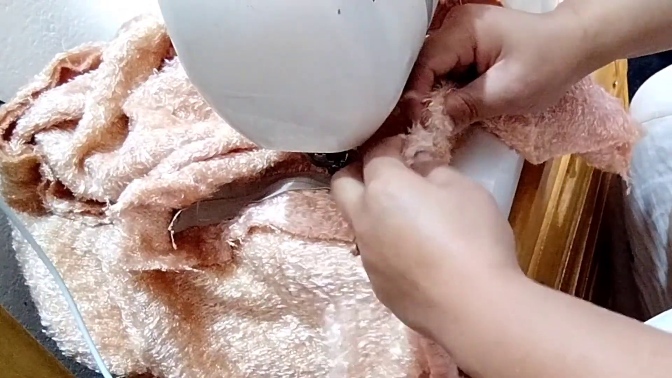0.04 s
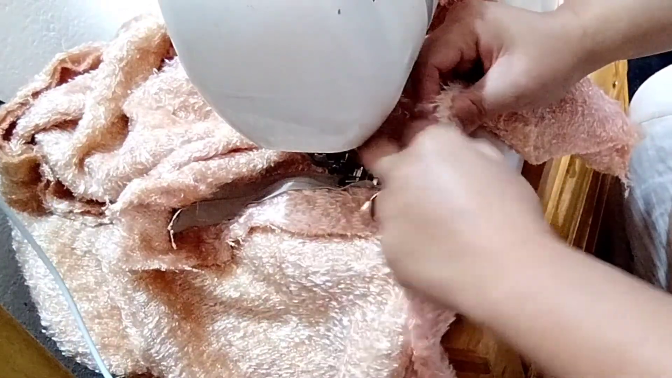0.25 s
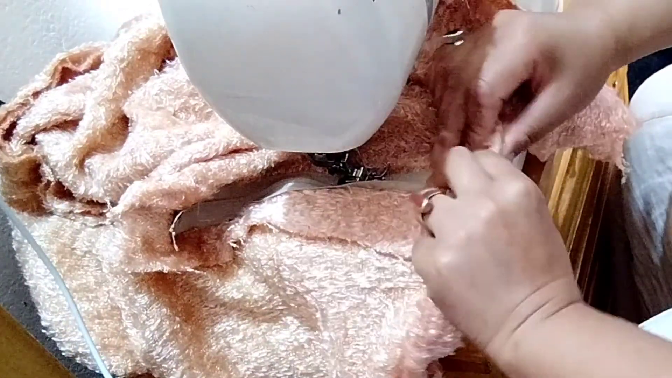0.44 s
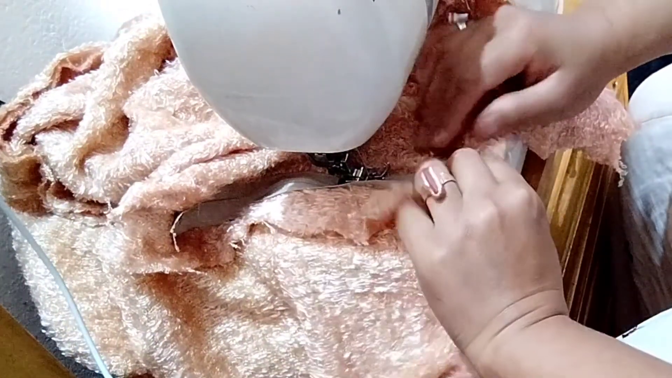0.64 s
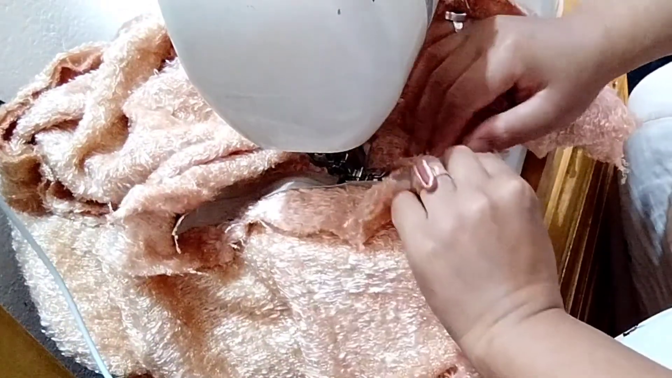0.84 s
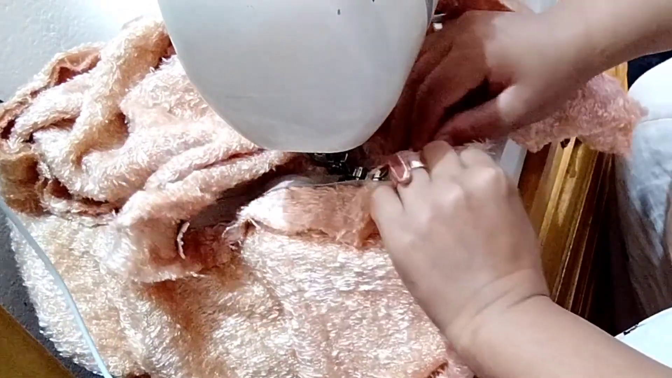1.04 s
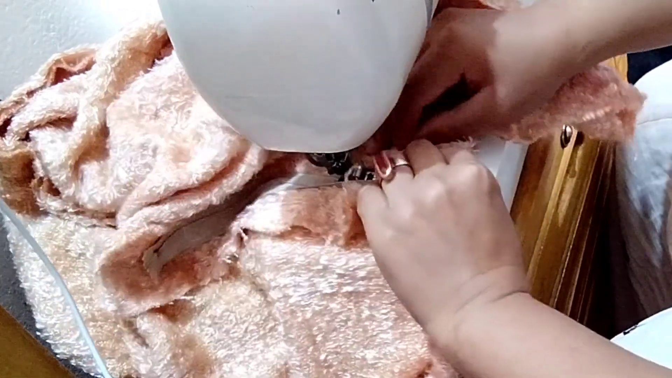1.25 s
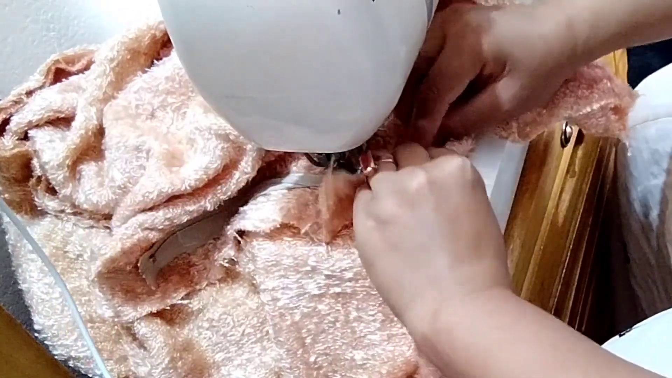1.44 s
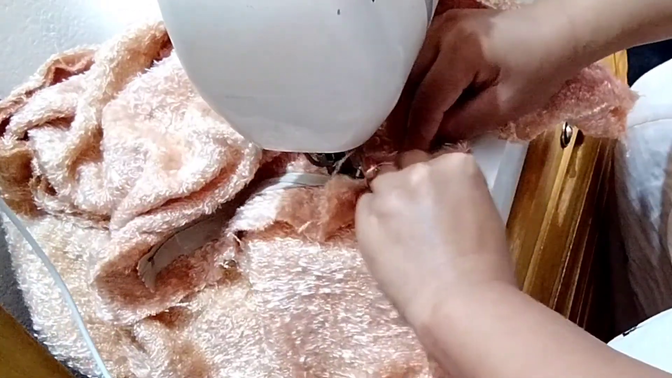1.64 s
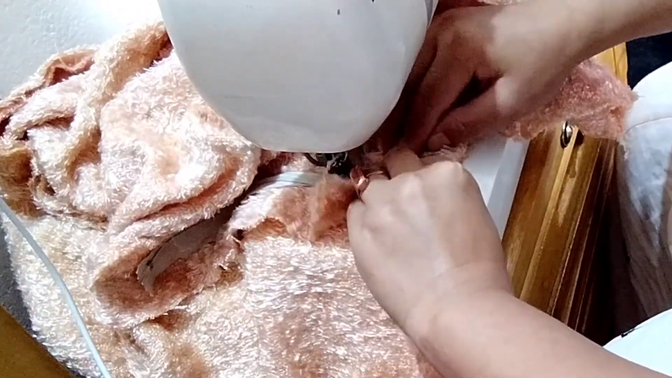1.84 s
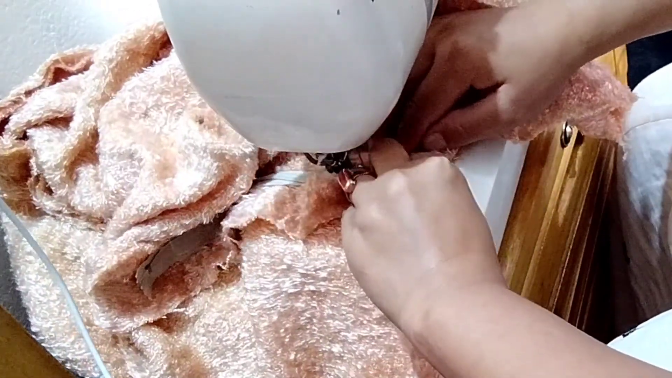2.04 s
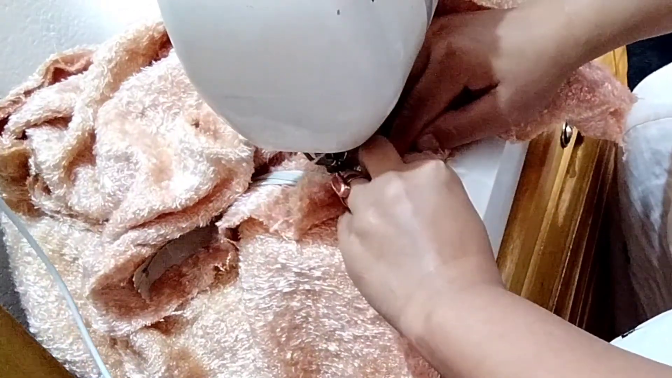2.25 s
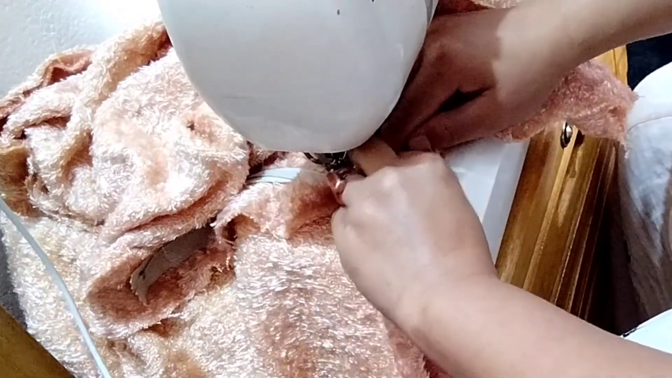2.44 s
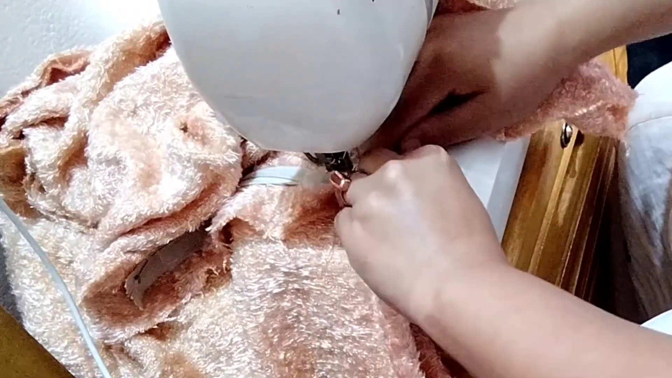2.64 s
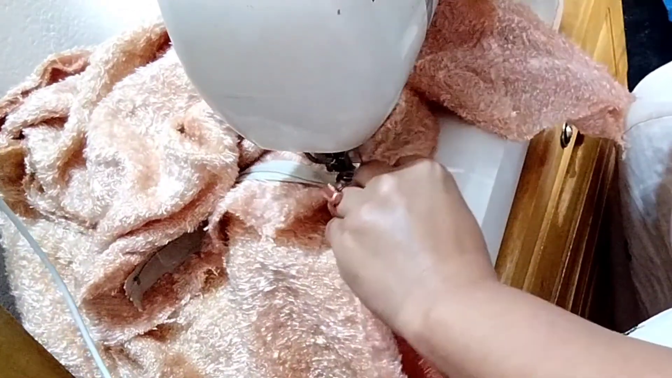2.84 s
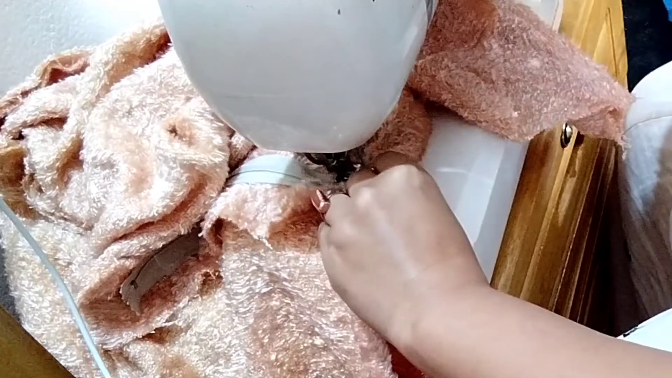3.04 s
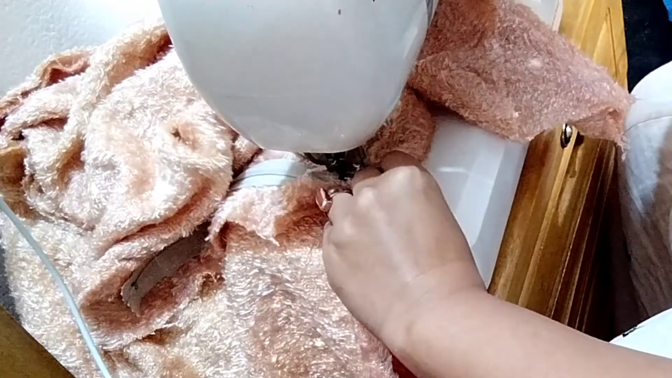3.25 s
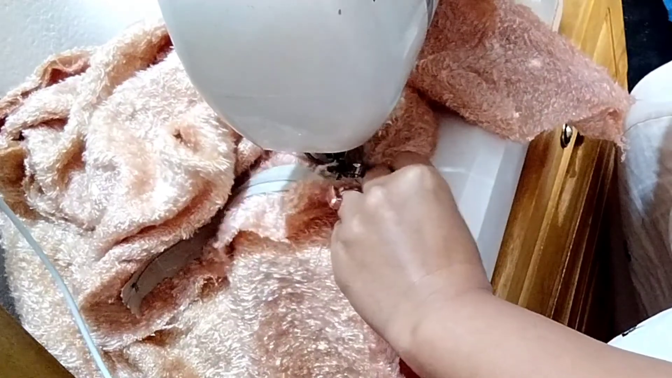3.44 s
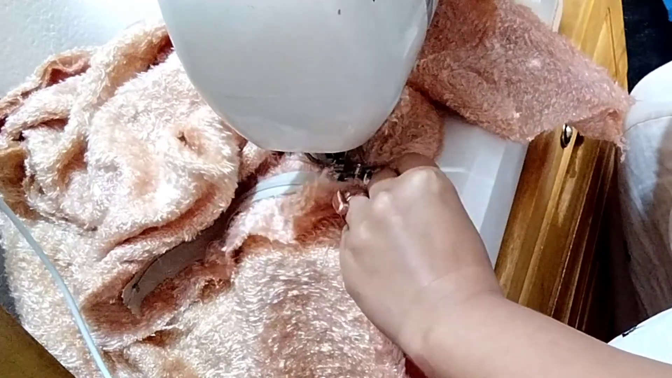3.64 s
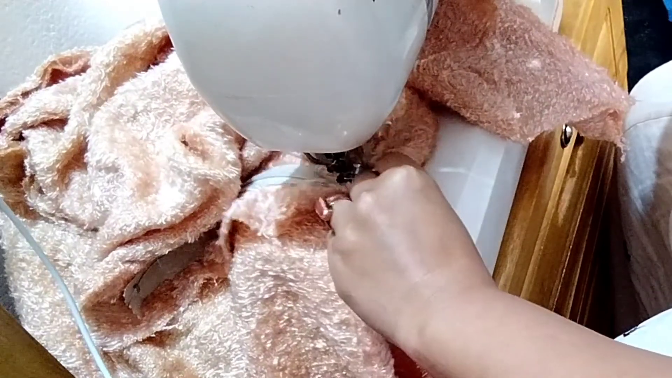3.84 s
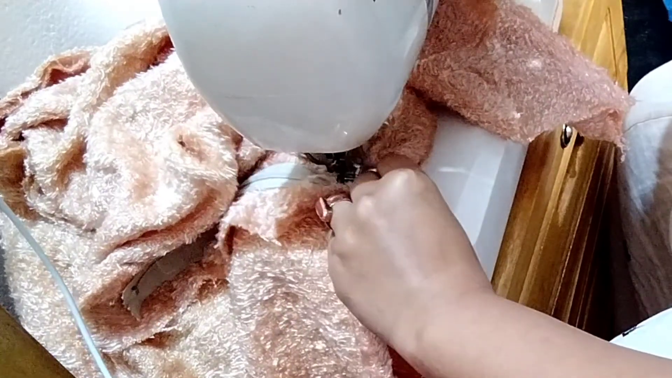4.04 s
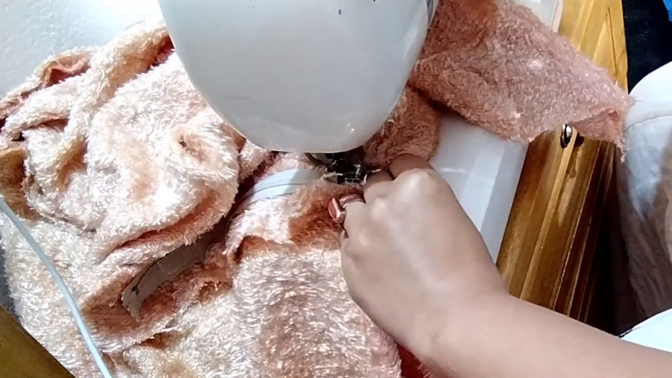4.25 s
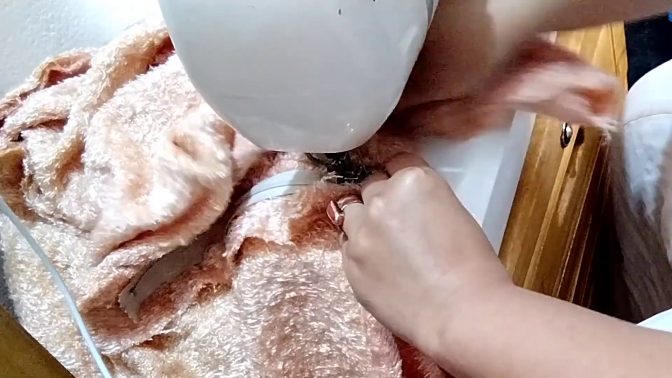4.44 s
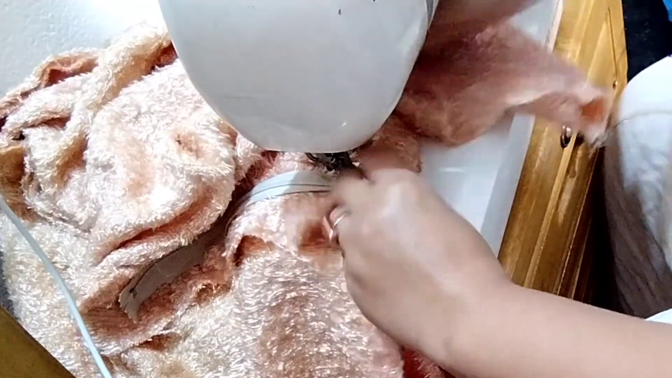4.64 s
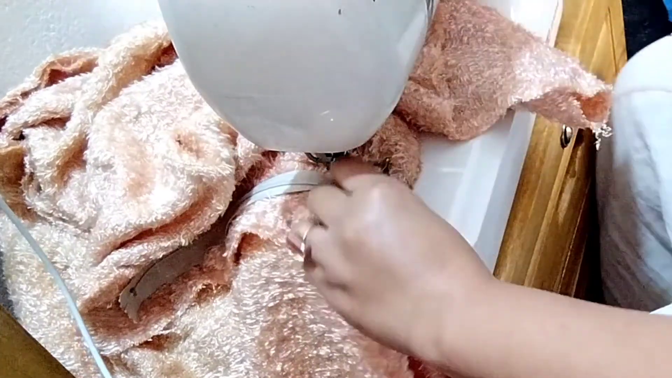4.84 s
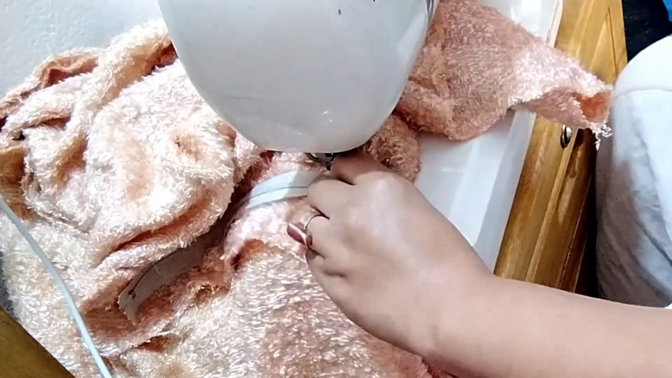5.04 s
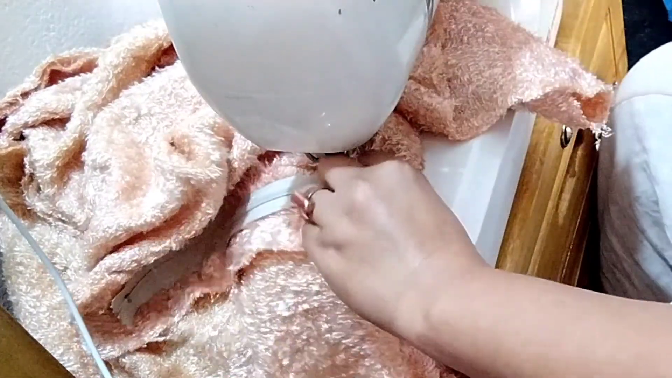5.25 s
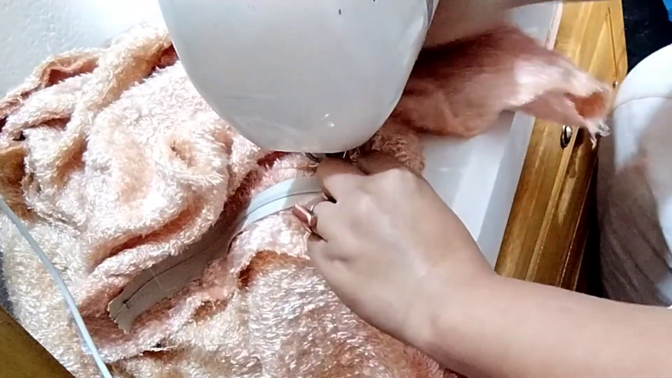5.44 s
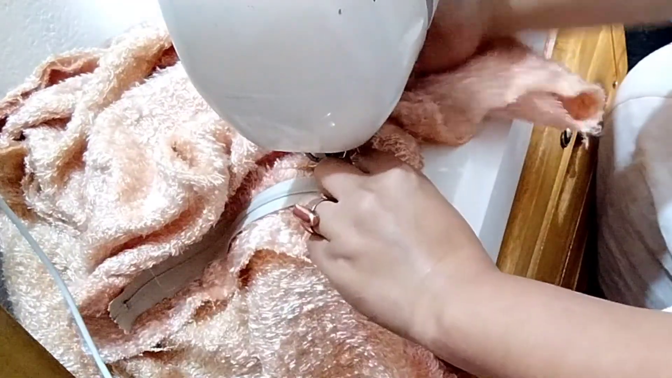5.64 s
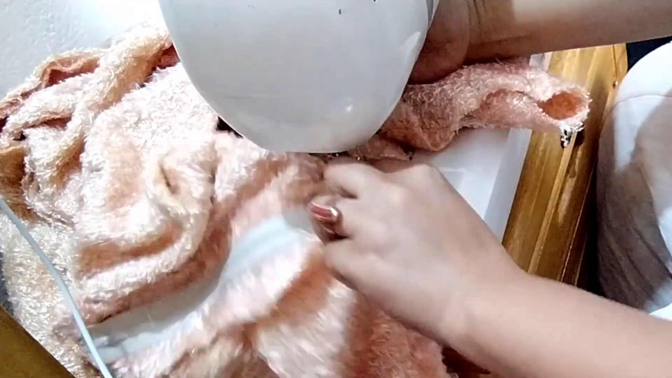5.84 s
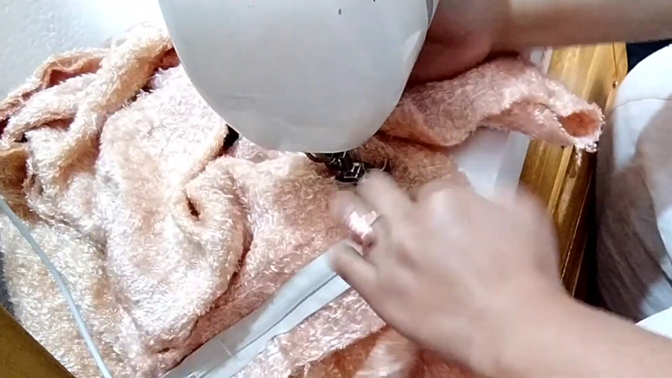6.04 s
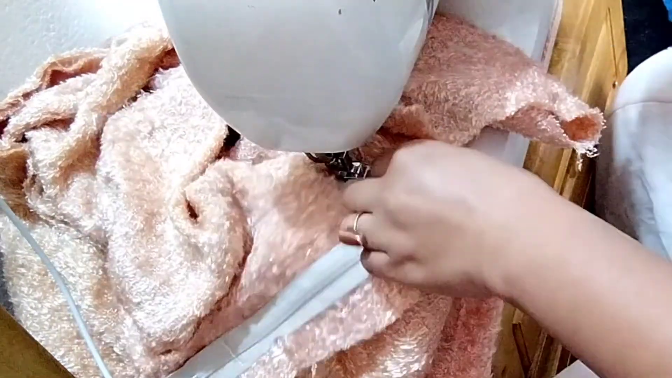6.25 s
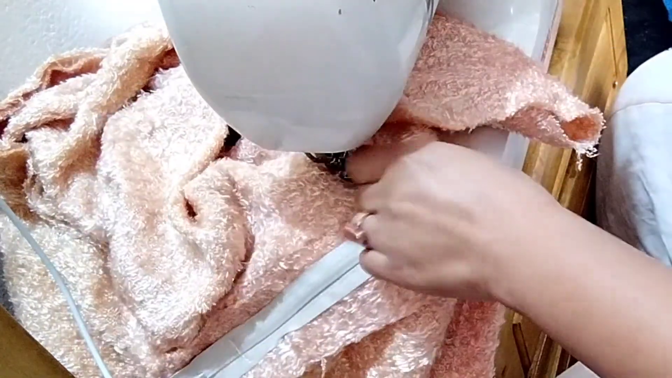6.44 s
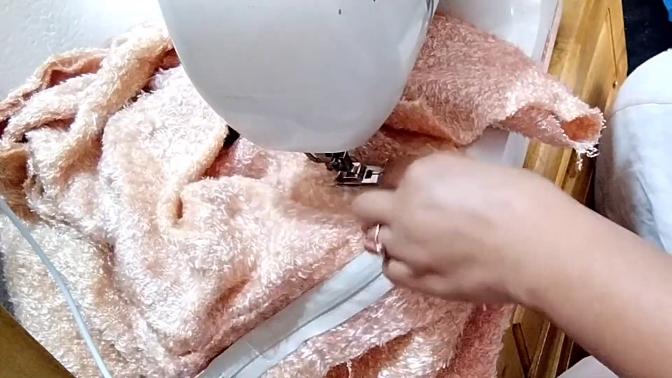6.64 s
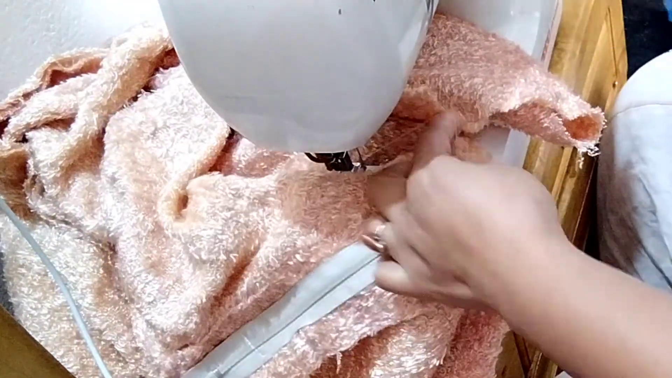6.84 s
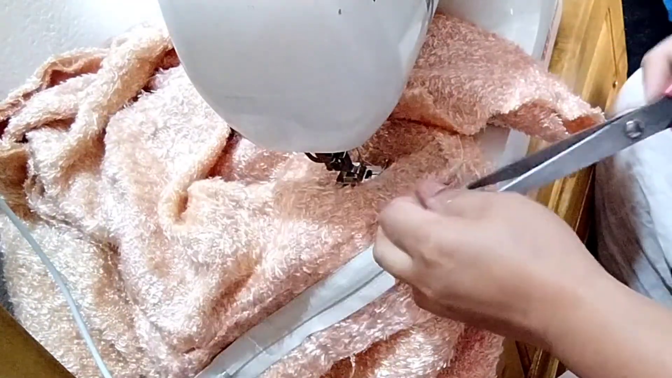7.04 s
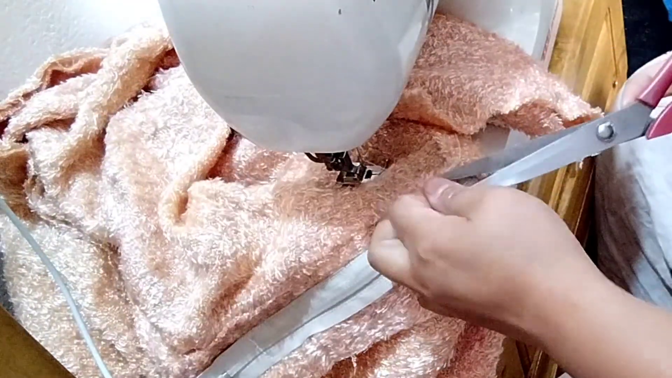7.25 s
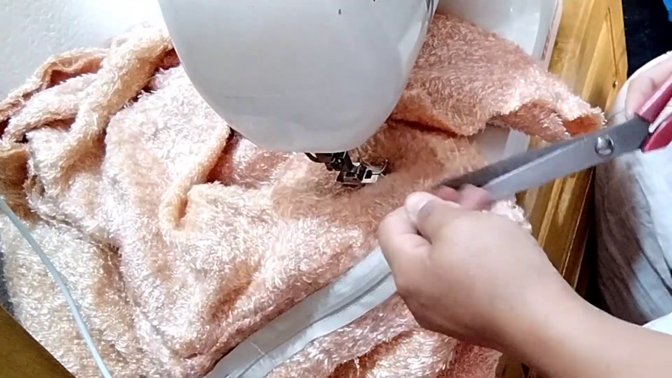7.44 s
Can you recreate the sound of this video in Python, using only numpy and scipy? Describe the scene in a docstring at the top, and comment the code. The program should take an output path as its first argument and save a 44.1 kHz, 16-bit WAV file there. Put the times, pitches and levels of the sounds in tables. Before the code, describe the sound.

In a small, quiet room, an electric sewing machine starts stitching thick towelling close to the microphone. The needle ticks and knocks rapidly over a rattling, low drone that shakes the wooden table, the speed wavering with one brief slowdown. After about three and a half seconds it stops. Hands shift the cloth with soft rustles, levers click and knock, and scissors clink and clatter briefly as they are picked up.

```python
"""Sewing machine on a wooden table

An electric machine stitches thick towelling at a wandering speed, then stops. Each needle stroke ticks,
knocks the housing and thumps the table; the linkage rattles over a low drone. Hands then shift the
cloth, work the levers and pick up scissors. Small room, faint hum."""
import sys
import numpy as np
from scipy import signal
from scipy.fft import rfft, irfft, next_fast_len
from scipy.io import wavfile
from scipy.ndimage import uniform_filter1d, map_coordinates

SR = 44100
rng = np.random.default_rng(int(sys.argv[2]) if len(sys.argv) > 2 else 0)


def wav_record(signal):
    """Record a signal, one row per channel, as 16-bit PCM in the file named by sys.argv[1]."""
    frames = np.transpose(np.atleast_2d(signal))
    bounded = np.clip(frames, -1, 1)
    # unit amplitude maps onto the largest positive 16-bit level
    quanta = np.round(bounded * 32767).astype(np.int16)
    wavfile.write(sys.argv[1], SR, quanta)


N = 330750
TIME_S = np.arange(N) / SR
FIRST_STITCH_S, BAND_LIMIT_HZ = 0.8225, 15800

# pace set by the pedal (time [s], rate [stitches/s])
STITCH_RATE = [(0.8, 12.6), (0.99, 13.8), (1.12, 21.7), (1.34, 23.0), (1.58, 6.0), (1.69, 15.8),
               (2.13, 14.4), (2.63, 15.3), (2.98, 19.6), (3.51, 21.7), (3.79, 19.8), (4.13, 21.3),
               (4.33, 9.3)]
# drive effort against the cloth (time [s], level [dB])
DRIVE_EFFORT = [(.778, -75), (.792, -52), (.88, -49.5), (.97, -42.5), (1.06, -40.5), (1.31, -37.5),
                (1.41, -41.5), (1.54, -48), (1.7, -40), (1.93, -39.5), (2.05, -47.5), (2.2, -43.5),
                (2.39, -47), (2.48, -42.5), (2.6, -44), (3.2, -38.5), (3.45, -40), (3.7, -38.5),
                (3.95, -38.5), (3.985, -41), (4.04, -39.5), (4.19, -39.5), (4.27, -45.5), (4.335, -44.5),
                (4.375, -57.5), (4.42, -66)]
# needle through thick folds (time [s], tick [dB], housing knock [dB])
FOLD_PUNCHES = [(0.8021, -48, -44.5), (0.8221, -43, -40.5), (.8995, -56.5, -43.5), (.9487, -48.5, -42),
                (0.9728, -46, -38.5), (1.0403, -45.5, -36), (1.0956, -41, -33.5), (1.1402, -39.5, -32),
                (1.189, -39, -39), (1.232, -41.5, -36), (1.278, -42, -33.5), (1.411, -46.5, -39),
                (1.4861, -46, -48), (1.589, -44.5, -43), (1.6921, -47, -37), (1.744, -44, -41.5),
                (1.8062, -45.5, -38), (1.8705, -42.5, -52), (1.948, -43.5, -46), (2.0098, -42.5, -45),
                (2.127, -53.5, -44), (2.2196, -41.5, -42.5), (2.291, -49, -41), (2.3465, -40, -37),
                (2.4174, -41, -36.5), (2.4811, -42.5, -34.5), (2.5515, -49.5, -39.5), (2.617, -47.5, -35),
                (2.6816, -44.5, -39), (2.7428, -40.5, -31.5), (2.812, -43.5, -37), (2.8563, -38, -34.5),
                (2.9091, -40, -35.5), (2.9682, -46.5, -44), (3.0869, -44.5, -37.5), (3.1134, -43.5, -34.5),
                (3.163, -39.5, -31.5), (3.2184, -42, -37), (3.3596, -49, -43), (3.4049, -42, -36),
                (3.453, -45.5, -41), (3.548, -42.5, -37.5), (3.687, -44, -34.5), (3.6984, -39, -36),
                (3.7387, -42, -36), (3.789, -43, -42), (3.8434, -38.5, -38), (3.992, -37, -41),
                (4.034, -40, -31.5), (4.0836, -44, -34.5), (4.1774, -44, -36), (4.3227, -39, -42.5)]
# table drone (time [s], base level [dB])
DRONE_LEVEL = [(.785, -56), (.88, -54), (.93, -45.5), (1.06, -45.5), (1.2, -44.5), (1.31, -40), (1.42, -42),
               (1.53, -60), (1.6, -40), (1.82, -46), (1.95, -45.5), (2.17, -44.5), (2.28, -49), (2.55, -45),
               (2.66, -45.5), (2.85, -42.5), (3.65, -47.5), (3.86, -40), (3.94, -44.5), (4.0, -50),
               (4.05, -41), (4.17, -48), (4.27, -41.5), (4.34, -54.5), (4.41, -87)]
# feed teeth snapping down (time [s], level [dB])
FEED_SNAPS = [(1.052, -46), (1.085, -55), (1.649, -54.5), (1.724, -45.5), (1.901, -57), (2.4035, -51.5),
              (2.652, -45), (2.7043, -54.5), (2.771, -45.5), (2.885, -47), (2.939, -45.5), (3.061, -50),
              (3.141, -46), (3.748, -47), (4.189, -42), (4.2414, -52), (4.2985, -65), (4.313, -46.5)]
# bobbin hook contacts (time [s], level [dB])
HOOK_TINKS = [(1.7664, -47), (1.8182, -44), (1.919, -46), (2.923, -46), (2.9806, -44), (3.032, -54.5),
              (3.1847, -42), (3.236, -43.5), (3.2807, -46), (3.333, -45.5), (3.381, -43.5), (3.4184, -45),
              (3.523, -50), (3.664, -51), (3.7574, -44.5), (3.808, -45), (3.8574, -43), (3.965, -50.5),
              (4.1997, -48)]
# lever, presser foot, drive and scissor contacts
# (time [s], clack [dB], thud re clack [dB], edge re clack [dB], table top [dB], t60 [s])
HANDLING_KNOCKS = [(.698, -67, -8, -22, -85, .07), (0.748, -72, -2, -22, -69, 0.036),
                   (.783, -68, 4, -25, -49, .06), (1.2795, -34.5, 0.5, -14, -38, 0.043),
                   (4.3236, -50, -3, 2, -44.5, 0.063), (4.518, -78, 11, -22, -61.5, .07),
                   (4.5708, -60.5, 10, -0.5, -70, 0.047), (4.576, -51.5, 3.5, -21, -56, .068),
                   (4.7028, -62.5, 8.5, -3, -64, 0.052), (4.762, -70, -7, -23, -66, 0.055),
                   (4.923, -62.5, 5.5, -19, -59, 0.099), (4.985, -52, 3, -15.5, -58, 0.078),
                   (5.0605, -56.5, 5, -13, -58, 0.059), (5.737, -65.5, 7, -15, -70, 0.069),
                   (5.7484, -61.5, -5, -9, -71, .04), (5.8185, -69, 12, -1, -70, .06),
                   (5.864, -72, 10, 7, -72, 0.04), (5.9658, -41.5, 1, -7.5, -47, 0.057),
                   (6.07, -61.5, -18, -4, -87, .009), (6.412, -42, 2.5, -15, -70, 0.062),
                   (6.4394, -53, 8, -5, -66, 0.097), (6.4502, -40.5, 1, -22, -45, 0.054),
                   (6.463, -44.5, -2, -13.5, -45, 0.043), (6.503, -47.5, -2, -28, -48, .063),
                   (6.5452, -56, 9, -23, -55, .088), (6.5762, -57, 4.5, -25, -47, .064),
                   (6.609, -50.5, 7.5, -14, -53, 0.09), (6.646, -57, 8, -20, -50, .077),
                   (6.675, -49.5, 16.5, -23, -65, 0.022), (6.6792, -41.5, 4, -23, -42, 0.017),
                   (6.6911, -49, 9.5, -21, -48, .1), (7.02, -82, 11, 6, -85, .03),
                   (7.254, -82, 2, 11, -78, .028)]
# heavy pushes on the table (time [s], level [dB])
TABLE_JOLTS = [(0.389, -63), (1.042, -35), (1.142, -38), (1.279, -29), (1.69, -50), (2.34, -37.5),
               (2.621, -36), (3.164, -42.5), (3.834, -36.5), (4.039, -42), (4.575, -55), (4.708, -50.5),
               (5.058, -49), (5.185, -57), (5.961, -52), (6.615, -46.5), (6.676, -51.5)]
# scissors picked up (time [s], base level [dB])
SCISSOR_CLINKS = [(6.413, -45.5), (6.448, -53), (6.4618, -52), (6.507, -58), (6.6805, -44.5), (6.6916, -60)]
# hands on the towelling (time [s], rub [dB], fibre hiss [dB])
HAND_RUB = [(0, -85, -97), (.12, -73, -93), (.3, -81.5, -99), (.56, -79.5, -96), (.76, -76, -89.5),
            (4.4, -71, -80.5), (4.85, -73.5, -87.5), (5.12, -75, -85), (5.33, -75, -93), (5.55, -74, -91),
            (5.75, -68.5, -84.5), (5.8, -71, -84), (5.88, -70, -83), (5.93, -68.5, -82.5), (6.3, -71, -86),
            (6.7, -65.5, -82.5), (6.85, -70, -82), (7.1, -77, -93), (7.5, -69.5, -83.5)]
# cloth dragged over the bed (peak time [s], rise [s], rub [dB], fibre hiss [dB])
CLOTH_SHOVES = [(.4, 0.035, -75.5, -80.5), (.444, 0.02, -82, -72), (4.55, 0.024, -76, -95),
                (5.03, 0.04, -52.5, -72.5), (5.065, 0.012, -48, -62), (5.158, 0.0065, -58, -79),
                (5.197, 0.043, -57, -68), (5.752, .007, -65, -75), (5.828, 0.011, -60, -69),
                (5.84, .005, -59, -69), (5.851, .003, -72, -72), (6.457, 0.0086, -43.5, -78),
                (6.509, 0.022, -51, -93), (6.635, 0.012, -52, -84), (6.991, 0.015, -68, -81),
                (7.435, 0.011, -64, -84)]
# room air (time [s], level [dB])
ROOM_AIR_LEVEL = [(0, -74), (.7, -79), (4.5, -72.5), (6.2, -70), (7.1, -70), (7.5, -71.5)]

# resonances (frequency [Hz], bandwidth [Hz], gain [dB])
PLATE_MODES = [(2624, 80, 1.5), (2924, 80, 0.5), (3520, 130, -1.5), (5580, 240, -4.5), (6400, 110, -0.5),
               (7100, 300, -7), (7820, 330, -3), (9050, 140, -12), (10200, 140, -12), (13950, 130, -13),
               (15200, 220, -13.5)]  # needle plate and presser foot
TABLE_MODES = [(196, 40, -14), (223.6, 22, -13), (267, 14, -4.5), (337.3, 24, -9), (371, 17, -2),
               (425, 45, -11)]  # table under the machine
SWAY_MODE = [(128, 47, 0)]  # table's lowest mode
TABLE_TOP_MODES = [(266.4, 22.5, 4), (371, 9, -5)]  # table top, lightly knocked
CASING_MODES = [(525, 6.3, -5), (660, 3, 5), (950, 14, -21.5), (1198, 20, 9.5), (1500, 13, 2),
                (2000, 14, -19), (2215, 71, -16.5), (2680, 14, -1.5), (3115, 58, -2.5)]  # plastic casing
# scissor blades (frequency [Hz], gain [dB], t60 [s])
BLADE_MODES = [(1050, -3, .07), (1366, 5, 0.051), (1560, -6, .08), (2008, 3.5, 0.045), (2310, 6.5, 0.027),
               (2579, -6.5, 0.093), (2750, -8, 0.071), (2930, -14, 0.18), (3050, -18, 0.3),
               (3460, -18, 0.12), (3800, -21, 0.089), (5170, -22, 0.053), (7500, -28, .03)]

# spectra (frequency [Hz], gain [dB])
NEEDLE_SPECTRUM = [(1500, -11), (2300, 2), (3400, -2), (5000, -6.5), (6400, 1), (7000, -4), (7900, 2),
                   (9000, -9), (10500, -14), (12500, -19), (14000, -18.5), (15700, -18)]  # needle bar and plate
HOUSING_SPECTRUM = [(300, -42.5), (450, 3), (540, -5), (710, 4), (780, 0.5), (880, -1.5), (960, 1),
                    (1120, -5.5), (1250, -2.5), (1420, -0.5), (1680, -6), (1780, -4), (1900, -7.5),
                    (2600, -12.5), (3500, -15.5), (4800, -24.5), (7000, -23)]  # machine housing
FEED_SPECTRUM = [(2000, -14.5), (3500, 10), (5000, -1), (6400, -0.5), (7000, -1.5), (7900, 0.5), (9000, -3),
                 (10500, -12), (12500, -12), (14000, -14), (15700, -13)]  # steel feed parts
HOOK_SPECTRUM = [(4500, -5), (6300, 4.5), (7000, 8.5), (8000, -0.5), (9500, -11), (12500, -14),
                 (14000, -2.5), (15500, -8.5)]  # bobbin hook
CLACK_SPECTRUM = [(700, -27), (900, 2), (1040, 3.5), (1150, 0), (1480, 0), (1680, -8.5), (1850, -11),
                  (2020, -8), (2350, -10), (2800, -14.5), (3150, -26), (3300, -20), (3550, -18),
                  (5000, -38)]  # hard contact
THUD_SPECTRUM = [(260, -21.5), (330, 1.5), (390, 3.5), (480, -8.5), (570, 2.5), (680, 0.5), (780, -3.5),
                 (900, -8.5), (1200, -18)]  # hollow casing
EDGE_SPECTRUM = [(1200, 8.5), (2200, -1.5), (3300, -1), (4200, 0.5), (5200, -2.5), (6400, -8.5), (7550, 1),
                 (9000, -16), (12000, -18), (15500, -18)]  # hard edges meeting
RUB_SPECTRUM = [(250, 2), (350, 6.5), (500, -8), (800, -0.5), (1050, -4), (1400, -1.5), (2100, -11),
                (3400, -25.5), (5000, -39)]  # sliding cloth
FIBRE_SPECTRUM = [(2000, -5.5), (3500, -1), (5200, -4), (6300, -7), (8000, -8.5), (10000, -16),
                  (15500, -17)]  # fibre hiss
AIR_SPECTRUM = [(15, -51.5), (25, -11.5), (86, -3.5), (110, -1.5), (200, -0.5), (349, -9.5), (433, -11),
                (469, -5), (648, -25), (1270, -17), (3170, -44), (5580, -41), (6550, -45), (15500, -42)]  # room air

# room decay (frequency [Hz], t60 [s])
SEWING_DECAY = [(100, 0.69), (500, 0.16), (3000, 0.06), (12000, 0.17)]  # for the running machine
HANDLING_DECAY = [(100, 0.21), (500, 0.2), (3000, 0.11), (12000, 0.14)]  # for knocks low on the table


def amp(db):
    """Decibels to gain."""
    return 10 ** (np.asarray(db) / 20)


def unit_rms(x):
    """Scale to rms 1."""
    return x / np.sqrt(np.mean(x ** 2) + 1e-20)


def steady(x, window_samples):
    """Hold the running rms near 1."""
    return x / np.sqrt(np.abs(uniform_filter1d(x ** 2, size=window_samples)) + 1e-6)


def log_interp(points, hz):
    """Interpolate (frequency, value) points on a log axis."""
    point_hz, values = np.transpose(points)
    return np.interp(np.log(hz + 1), np.log(point_hz + 1), values)


def envelopes(rows):
    """Per-sample gain for each dB column, silent outside the rows."""
    times_s, *columns_db = np.transpose(rows)
    return amp([np.interp(TIME_S, times_s, db, left=-120, right=-120) for db in columns_db])


def wobble(rate_hz):
    """Smooth random curve, rate_hz knots a second."""
    knots = rng.standard_normal(int(N * rate_hz / SR) + 4)
    return map_coordinates(knots, [np.arange(N) * rate_hz / SR])


def colour(spectrum, size=4096):
    """Minimum-phase impulse response of a spectrum, rolled off beyond its ends."""
    closed = [(spectrum[0][0] / 2, -80), *spectrum, (spectrum[-1][0] * 2, -80)]
    gain = amp(log_interp(closed, np.fft.rfftfreq(size, 1 / SR)))
    cepstrum = irfft(np.log(gain))
    cepstrum[1:size // 2] *= 2
    cepstrum[size // 2 + 1:] = 0
    return irfft(np.exp(rfft(cepstrum)))[:size // 2]


def ring(modes, size=8192):
    """Impulse response of damped modes; small bodies radiate little deep bass."""
    t = np.arange(size) / SR
    ringing = sum((-1) ** k * amp(db) * width_hz * np.exp(-np.pi * width_hz * t)
                  * np.cos(2 * np.pi * hz * t) for k, (hz, width_hz, db) in enumerate(modes))
    top_hz = 1.134 * max(mode[0] for mode in modes)
    return signal.sosfilt(signal.butter(2, [80, top_hz], "band", fs=SR, output="sos"), ringing)


def through(x, response):
    """Convolve, keeping the length of x."""
    return signal.fftconvolve(x, response)[:len(x)]


def driven(force, response):
    """Force into a body of unit power gain."""
    return through(force, response / np.linalg.norm(response))


def blows(times_s, levels_db, response, t60_s, rise_s, graze_db=-40, size=10000):
    """Contacts graze, then land as noise bursts into a body; levels are peak short-term rms."""
    lead = size // 16
    out = np.zeros(N + size)
    t = (np.arange(size) - lead) / SR
    after_s = np.maximum(t, 0)
    graze = amp(graze_db) * np.exp(-np.abs(t) / 0.004)
    for at_s, db, decay_s in zip(times_s, levels_db, np.broadcast_to(t60_s, len(times_s))):
        landing = amp(-60 * after_s / decay_s) * (1 - np.exp(-after_s / rise_s))
        force = rng.standard_normal(size) * (graze + landing / landing.max())
        hit = through(force, response)
        peak_rms = np.sqrt(uniform_filter1d(hit ** 2, size=180).max())
        out[round(at_s * SR) - lead:][:size] += amp(db) * hit / peak_rms
    return out[:N]


def shaft_turns():
    """Running count of shaft turns, one per stitch."""
    rate_hz = np.interp(TIME_S, *np.transpose(STITCH_RATE), right=0)
    return np.cumsum(rate_hz * (TIME_S >= FIRST_STITCH_S)) / SR


def needle(turns):
    """Each stroke ticks, rings the plate, knocks the housing and thumps the table; folds hit harder."""
    stitch_s = np.searchsorted(turns, np.arange(0, turns[-1], 1), side="right") / SR
    effort_db = np.interp(stitch_s, *np.transpose(DRIVE_EFFORT))
    tick_spread_db, knock_spread_db = -2 * rng.standard_normal((len(stitch_s), 2)).T
    plain = np.column_stack([stitch_s, effort_db + tick_spread_db - 13, effort_db + knock_spread_db - 4])
    punches = np.array(FOLD_PUNCHES)
    clear_of_folds = np.abs(stitch_s[:, None] - punches[:, 0]).min(axis=1) > 0.02
    times_s, tick_db, knock_db = np.vstack([punches, plain[clear_of_folds]]).T
    thumps = blows(times_s, knock_db - 6.5, ring(TABLE_MODES), t60_s=0.0029, rise_s=0.00056)
    # slow rise: the loose housing lags the tick
    knocks = blows(times_s, knock_db, colour(HOUSING_SPECTRUM), t60_s=0.058, rise_s=0.003, graze_db=-13)
    ticks = blows(times_s, tick_db, colour(NEEDLE_SPECTRUM), t60_s=0.026, rise_s=0.0007, graze_db=-22)
    plate = blows(times_s, tick_db - 7, ring(PLATE_MODES), t60_s=0.0099, rise_s=0.00059)
    return thumps + knocks + ticks + plate


def rattle(turns, hits_per_turn, spread_db, t60_s, sliding_gain):
    """Loose joints strike with uneven timing and strength over sliding noise."""
    due_turns = np.arange(0, turns[-1], 1 / hits_per_turn)
    lateness, strength = rng.standard_normal((len(due_turns), 2)).T
    hit_turns = due_turns + 0.2 * lateness / hits_per_turn
    hit_samples = np.minimum(np.searchsorted(turns, hit_turns), N - 1)
    hit_power = amp(spread_db * np.clip(strength, -2, 1.6)) ** 2
    power_decay = amp(-60 * np.arange(SR // 10) / SR / t60_s) ** 2
    power = np.abs(through(np.bincount(hit_samples, hit_power, N), power_decay))
    running = (turns > 0) & (turns < turns[-1])
    return np.sqrt(power / power[running].mean() + sliding_gain ** 2) * rng.standard_normal(N)


def drive(turns):
    """Linkage and feed rattle table, housing and steel in step with the effort, over the drone."""
    effort, = envelopes(DRIVE_EFFORT)
    linkage = rattle(turns, hits_per_turn=7, spread_db=6, t60_s=0.052, sliding_gain=0.89)
    feed = rattle(turns, hits_per_turn=4, spread_db=3.5, t60_s=0.02, sliding_gain=0.6)
    shake = amp(-1) * steady(driven(linkage, ring(TABLE_MODES)), 1800)
    clatter = amp(-0.27) * steady(driven(linkage, colour(HOUSING_SPECTRUM)), 1500)
    chatter = amp(-16) * steady(driven(feed, colour(FEED_SPECTRUM)), 2400)
    jingle = amp(-22.5) * steady(driven(feed, ring(PLATE_MODES)), 2400)
    return drone(linkage) + effort * (shake + clatter + chatter + jingle)


def drone(linkage):
    """Machine and table top swing together in a low, wavering tone, roughened by the linkage."""
    level, = envelopes(DRONE_LEVEL)
    pitch_hz = 121.5 + 3.6 * wobble(14)
    tone = np.sqrt(2) * np.sin(2 * np.pi * np.cumsum(pitch_hz) / SR)
    rumble = steady(driven(linkage, ring(SWAY_MODE)), 2600)
    return level * (amp(-3.3) * tone + amp(-4.5) * rumble)


def feed_teeth():
    """Steel teeth snap down between needle strokes."""
    times_s, db = np.transpose(FEED_SNAPS)
    return blows(times_s, db, colour(FEED_SPECTRUM), t60_s=0.021, rise_s=0.0007, graze_db=-4.5)


def bobbin_hook():
    """The steel hook tinks in the fast runs."""
    times_s, db = np.transpose(HOOK_TINKS)
    return blows(times_s, db, colour(HOOK_SPECTRUM), t60_s=0.019, rise_s=0.0011)


def handling():
    """Hard contacts clack and ring the hollow plastic casing; the table top answers."""
    times_s, clack_db, thud_db, edge_db, wood_db, t60_s = np.transpose(HANDLING_KNOCKS)
    clack = blows(times_s, clack_db, colour(CLACK_SPECTRUM), t60_s, rise_s=0.0013, graze_db=-14)
    thud = blows(times_s, clack_db + thud_db, colour(THUD_SPECTRUM), t60_s, rise_s=0.00029, graze_db=-14)
    casing = blows(times_s, clack_db - 14.5, ring(CASING_MODES), t60_s=0.014, rise_s=0.000336)
    wood = blows(times_s, wood_db, ring(TABLE_TOP_MODES), t60_s=0.0044, rise_s=0.00057)
    edge = blows(times_s, clack_db + edge_db, colour(EDGE_SPECTRUM), 0.77 * t60_s,
                 rise_s=0.00023, graze_db=-14)
    return clack + thud + casing + wood + edge


def jolts():
    """Heavy pushes swing the table in its lowest modes."""
    times_s, db = np.transpose(TABLE_JOLTS)
    low_modes = ring([(122, 9.7, 3.5), (196.4, 25, -10)])
    return blows(times_s, db, low_modes, t60_s=0.016, rise_s=0.00142)


def scissors():
    """Each clink rings the blades; one faint mode outlasts the rest."""
    out = np.zeros(N + SR)
    t = np.arange(SR // 2) / SR
    attack = 1 - np.exp(-t / 0.00069)
    for at_s, clink_db in SCISSOR_CLINKS:
        for hz, mode_db, t60_s in BLADE_MODES:
            phase = 2 * np.pi * hz * t + 1.3 * wobble(110)[:len(t)]
            level_db = clink_db + mode_db + rng.normal(0, 1.3) - 60 * t / t60_s
            out[round(at_s * SR):][:len(t)] += amp(level_db) * np.sin(phase) * attack
    return out[:N]


def cloth(snags_per_s=30, snag_t60_s=0.006):
    """Towelling catches and slips, swelling with each shove; single fibres crackle as they let go."""
    rub_gain, hiss_gain = envelopes(HAND_RUB)
    hiss_gain *= amp(1.5 * wobble(12) + 2 * wobble(60))
    for peak_s, rise_s, rub_db, hiss_db in CLOTH_SHOVES:
        offset = (TIME_S - peak_s) / rise_s
        shove = np.exp(-np.where(offset < 0, offset ** 2, offset))
        rub_gain += amp(rub_db) * shove
        hiss_gain += amp(hiss_db) * shove
    grip_db = 3 * wobble(260) + 1.6 * wobble(45)
    friction = unit_rms(amp(grip_db) * rng.standard_normal(N))
    releases = (rng.random(N) < snags_per_s / SR) * rng.uniform(-1, 1, N)
    snap = amp(-60 * TIME_S[:400] / snag_t60_s) * rng.standard_normal(400)
    snags = unit_rms(through(releases, snap))
    rub = driven(friction, colour(RUB_SPECTRUM))
    hiss = driven(friction + amp(-9.5) * snags, colour(FIBRE_SPECTRUM))
    return rub_gain * rub + hiss_gain * hiss


def squeak(peak_s=5.5, half_length_s=0.045, pitch_hz=5550, width_hz=120, level_db=-86):
    """Sliding cloth gives one thin, rough whistle."""
    swell = np.exp(-((TIME_S - peak_s) / half_length_s) ** 2)
    whistle = driven(rng.standard_normal(N), ring([(pitch_hz, width_hz, 0)]))
    return amp(level_db) * swell * whistle


def room_air(hum_hz=123.4, hum_width_hz=4.7):
    """Quiet air with a low, wavering hum."""
    level, = envelopes(ROOM_AIR_LEVEL)
    hum = steady(driven(rng.standard_normal(N), ring([(hum_hz, hum_width_hz, 0)])), 9000)
    air = driven(rng.standard_normal(N), colour(AIR_SPECTRUM))
    return level * (air + amp(-5) * hum)


def reverb(x, decay):
    """Short diffuse room tail; bass lasts longest."""
    hz, t, noise = signal.stft(rng.standard_normal(SR // 2), SR, nperseg=256)
    fade = amp(-60 * t / log_interp(decay, hz)[:, None])
    _, tail = signal.istft(noise * fade, SR, nperseg=256)
    return driven(x, np.pad(tail, (200, 0)))


def scene():
    """Machine and hands close by, the room around them; mono."""
    turns = shaft_turns()
    sewing = needle(turns) + feed_teeth() + drive(turns) + bobbin_hook()
    hands = handling() + jolts() + scissors()
    room = amp(-13) * reverb(sewing, SEWING_DECAY) + amp(-9.5) * reverb(hands, HANDLING_DECAY)
    return (sewing + hands + room + cloth() + squeak() + room_air())[None]


def record(dry):
    """Brick-wall low-pass at the band limit."""
    size = next_fast_len(N + SR // 2)
    passband = np.fft.rfftfreq(size, 1 / SR) < BAND_LIMIT_HZ
    return irfft(rfft(dry, size) * passband, size)[..., :N]


dry = scene()
out = record(dry)
wav_record(out)
```